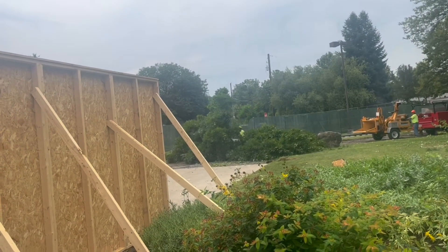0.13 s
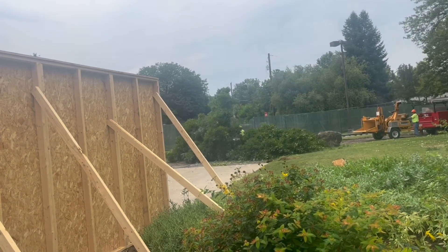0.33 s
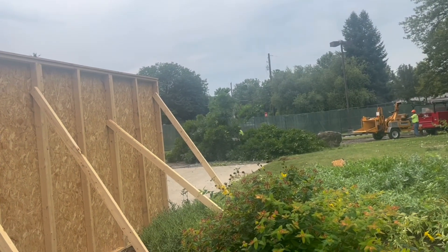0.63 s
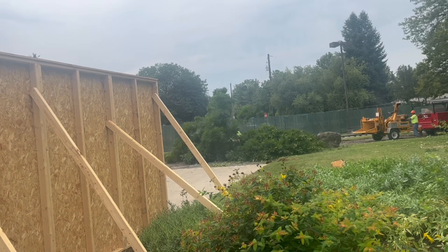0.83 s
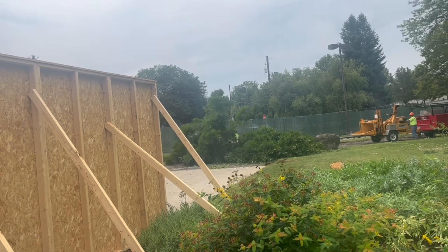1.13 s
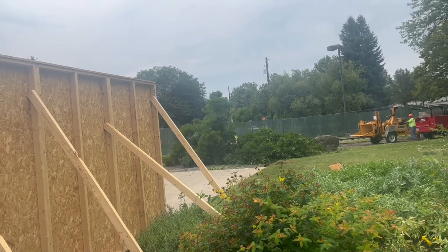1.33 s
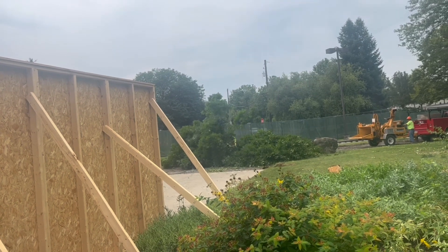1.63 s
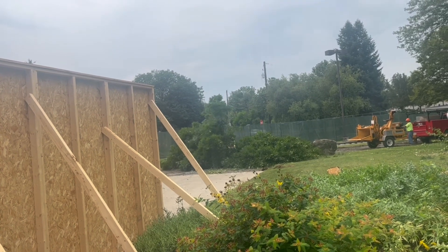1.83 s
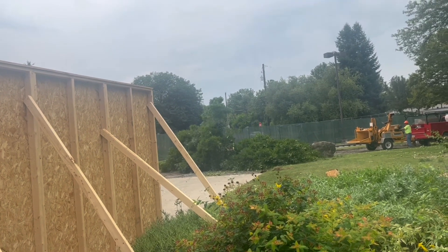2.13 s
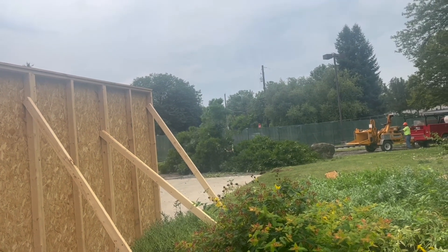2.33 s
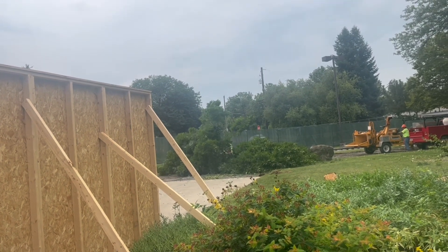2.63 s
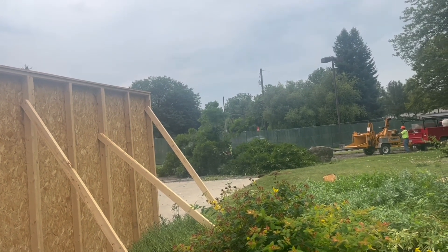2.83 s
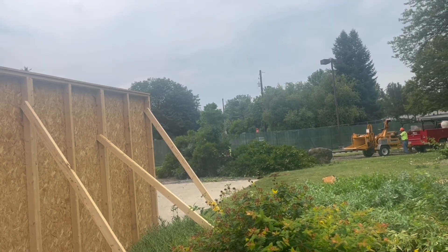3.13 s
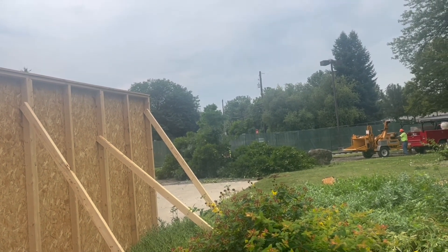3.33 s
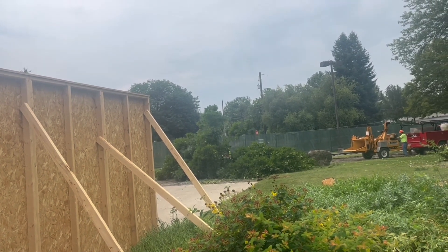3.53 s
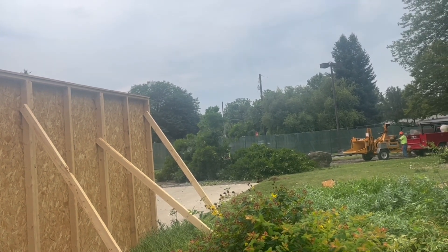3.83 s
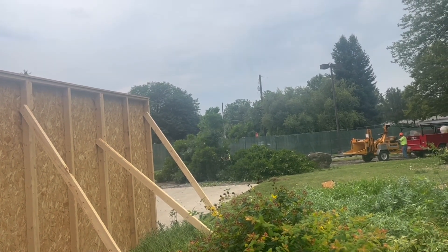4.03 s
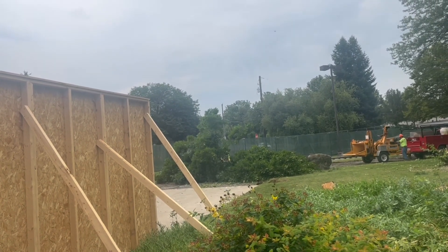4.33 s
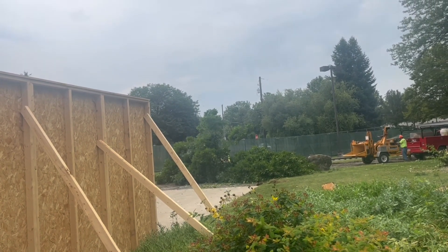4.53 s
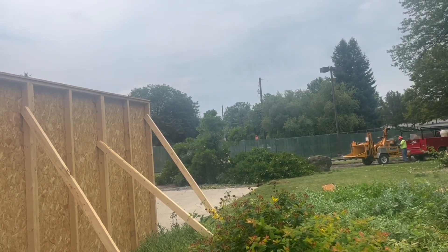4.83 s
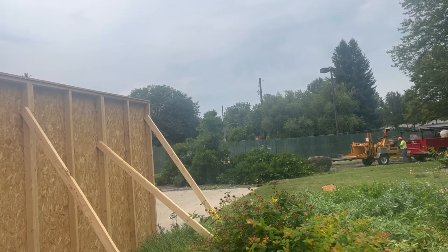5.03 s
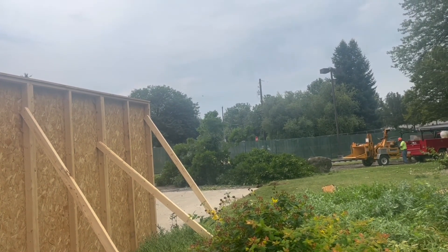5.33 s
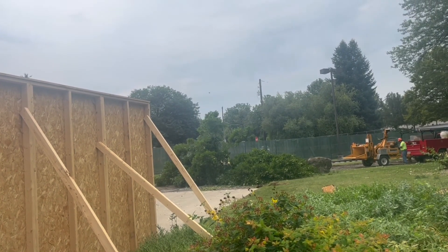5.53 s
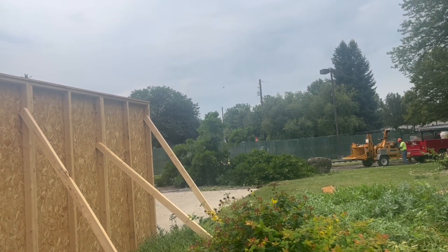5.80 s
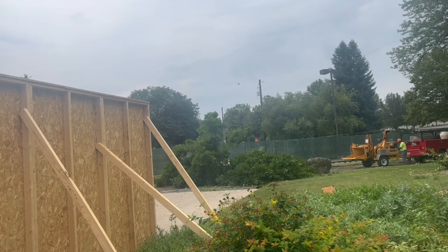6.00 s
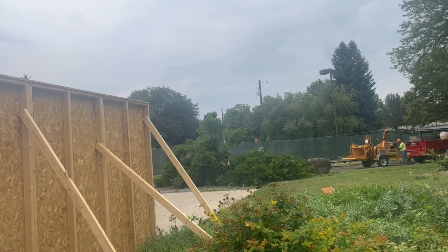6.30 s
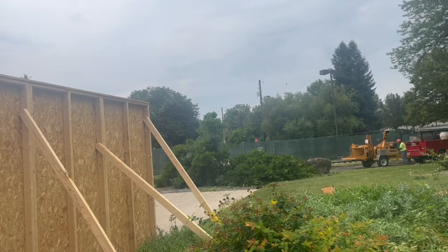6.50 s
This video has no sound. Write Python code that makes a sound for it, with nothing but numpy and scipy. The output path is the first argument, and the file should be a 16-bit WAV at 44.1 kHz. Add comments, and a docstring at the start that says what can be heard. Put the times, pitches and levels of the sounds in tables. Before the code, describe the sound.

Outdoor tree work: low engine throb and metallic idling clatter, then a chainsaw revs hard, cuts, races free, sags and recovers.

```python
"""A tree crew works beyond a lawn, over distant traffic made of soft coloured noise.
At first metal clatters to a chainsaw's idle, above a chipper diesel's drone of wavering tones; a hum and a rustle pass.
After 1.3 s the saw sputters and howls up to speed: pulses ring its muffler and casing, noise hisses as its chain.
It labours in a cut, races free, bogs, races again and bogs once more, while high crank orders whine.
Trees and a fence scatter the saw's exhaust and rasp, and moving air makes its resonances waver."""
import sys
import numpy as np
from scipy import signal
from scipy.fft import rfft, irfft, next_fast_len
from scipy.io import wavfile
from scipy.ndimage import uniform_filter1d

SR = 44100
rng = np.random.default_rng(int(sys.argv[2]) if len(sys.argv) > 2 else 0)


def generate_wav(sig):
    """Save sig (samples, or channels by samples) to the path in sys.argv[1] as 16-bit PCM at SR."""
    pcm = np.round(np.clip(np.atleast_2d(sig).T, -1, 1) * 32767).astype(np.int16)
    wavfile.write(sys.argv[1], SR, pcm)


N = 293706
TIME = np.arange(N) / SR
FREQS = np.fft.rfftfreq(N, 1 / SR)

IDLE_HZ = 48  # crank turns, and so firings, per second
BUILD_S = 0.24  # rasp and hiss build more slowly than the exhaust


def undb(db):
    """Decibels to gain."""
    return 10 ** (np.asarray(db) / 20)


def unit(x):
    """Scale to rms 1."""
    return x / np.sqrt(np.mean(x ** 2))


def steady(x):
    """Even out the loudness: hold the rms near 1 over a sliding fifth of a second."""
    return x / np.sqrt(uniform_filter1d(x ** 2, size=SR // 5) + 1e-18)


def curves(table):
    """The columns of a timed table, one value per sample."""
    s, *columns = np.transpose(table)
    return [np.interp(TIME, s, column) for column in columns]


def across(points):
    """Points joined on a log-frequency axis."""
    hz, value = np.transpose(points)
    return np.interp(np.log(FREQS + 1), np.log(hz), value)


def colour(x, spectrum):
    """Filter by a spectrum of (frequency [Hz], level [dB])."""
    return irfft(rfft(x) * undb(across(spectrum)), N)


def noise():
    """White noise."""
    return rng.standard_normal(N)


def walk(rate):
    """Smooth random drift of spread 1 that changes about rate times a second."""
    size = next_fast_len(N // 32)
    hz = np.fft.rfftfreq(size, TIME[-1] / size)
    keep_slow = np.exp(-(hz / rate) ** 2) * (hz > 0)
    slow = irfft(rfft(rng.standard_normal(size)) * keep_slow, size)
    return unit(np.interp(TIME, np.linspace(0, TIME[-1], size), slow))


def resonate(x, modes, waver_db):
    """Steep resonances; moving air lets each one fade and swell on the way."""
    out = 0
    for hz, width, db in modes:
        edges = np.clip([hz - width / 2, hz + width / 2], 20, SR / 2 - 1)
        bandpass = signal.butter(3, edges, "bandpass", fs=SR, output="sos")
        band = signal.sosfilt(bandpass, x)
        out = out + band * undb(db + waver_db * walk(17.0))
    return out


def scatter(x, t60, wet_db):
    """Trees and fence return a thin diffuse tail, different at each port; t60 in seconds."""
    t = TIME[:SR // 2]
    # the first returns come after 8 ms
    tail = rng.standard_normal((2, len(t))) * undb(-60 * t / t60) * (t > .008)
    tail /= np.sqrt(np.sum(tail ** 2, axis=1, keepdims=True))
    wet = signal.fftconvolve(x[None], tail, axes=1)[:, :N]
    return x + undb(wet_db) * wet


def wide(spectrum, side_db):
    """Coloured stereo noise of rms 1, mostly alike at both ports."""
    side = noise() * np.array([[1], [-1]])
    return unit(colour(noise() + undb(side_db) * side, spectrum))


def opening(seconds):
    """Rise from 0 to 1 once the throttle is pulled at 1.3 s."""
    return np.clip((TIME - 1.3) / seconds, 0, 1)


def traffic():
    """Far roads blend into a soft, steady wash with a faint flutter."""
    # colour of distant traffic: (frequency [Hz], relative level [dB per Hz])
    road_colour = [(100, -9.5), (230, 2.5), (310, -4.5), (660, -9.5), (920, -13.5), (1550, -12.5),
                   (3000, -14.5), (4500, -24), (6800, -22), (9000, -104), (12500, -69)]
    return wide(road_colour, side_db=-8.5) * undb(-39.02 + 0.29 * walk(24))


def clatter():
    """Uneven idle firings shake loose metal, until the throttle opens."""
    # resonances of the loose metal: (frequency [Hz], width [Hz], level [dB])
    metal_modes = [(1180, 230, -2), (2050, 210, -1), (2670, 310, -5), (5330, 3200, -20)]
    turns = np.cumsum(IDLE_HZ * np.exp(0.12 * walk(33))) / SR
    knocks = np.exp(-(turns % 1) / 0.32) * undb(2.7 * walk(33)) * noise()
    metal = unit(resonate(knocks, metal_modes, waver_db=2.5)) * undb(-52)
    return scatter(metal, t60=0.11, wet_db=-20) * (1 - opening(BUILD_S))


def chipper():
    """The diesel sags and recovers as its throb changes; uneven cylinders add half orders and rumble."""
    # engine speed: (time [s], firing rate [Hz])
    diesel_speed = [(0, 59.43), (2.3, 57.27), (2.9, 55.23), (3.35, 50.62), (3.9, 54.32), (5.35, 55.1),
                    (5.95, 60.8), (6.66, 59.3)]
    # loudness: (time [s], fundamental [dB], second harmonic [dB])
    diesel_level = [(0, -36.5, -39.5), (1.2, -38.5, -40), (3.25, -34.5, -41), (3.5, -28.5, -39),
                    (3.76, -27.5, -46), (3.95, -42, -38.5), (4.25, -25.5, -35.5), (4.5, -41, -40),
                    (4.85, -28.5, -38), (5.2, -35.5, -38.5), (5.6, -27, -35), (6.02, -26.5, -28),
                    (6.66, -28, -29)]
    # weaker orders: (multiple of the firing rate, level against the second harmonic [dB])
    half_orders = [(2.5, -13.5)]
    # colour of the engine rumble: (frequency [Hz], relative level [dB per Hz])
    rumble_colour = [(20, -42), (31, -4), (40, -0.5), (55, -4.5), (77, 3.5), (98, -11), (135, -6.5),
                     (200, -12), (300, -45.5)]
    hz, = curves(diesel_speed)
    first_db, second_db = curves(diesel_level)
    phase = 2 * np.pi * np.cumsum(hz * (1 + 0.005 * walk(11.0))) / SR
    drone = np.cos(phase) * undb(first_db)
    drone += np.cos(2 * phase) * undb(second_db + 1.6 * walk(3.1))
    for order, db in half_orders:
        drone += np.sin(order * phase) * undb(second_db + db + 6.7 * walk(3.1))
    throb = -np.sqrt(2) * drone * undb(1.25 * walk(28))
    rumble = wide(rumble_colour, side_db=-57) * undb(-34.5 + 1.5 * walk(17))
    return throb + rumble


def hum(s, length, hz, db):
    """One wavering tone that swells and fades around time s."""
    phase = 2 * np.pi * np.cumsum(hz * (1 + 0.0097 * walk(20.0))) / SR
    return np.sqrt(2) * np.sin(phase) * undb(db) * np.exp(-((TIME - s) / length) ** 2)


def hums():
    """Low hums with harmonics, and faint higher ones, swell and fade within a moment."""
    # low hums: (time [s], length [s], fundamental [Hz], level before the harmonic's own [dB])
    low_hums = [(0.273, 0.096, 71.8, -30), (2.336, 0.33, 73.3, -40.5)]
    # harmonics of every low hum: (multiple, level [dB])
    hum_harmonics = [(1, 1.5), (2, 3), (3, -10)]
    # higher hums: (time [s], length [s], frequency [Hz], level [dB])
    faint_hums = [(0.454, 0.14, 265.3, -49.5), (1.275, 0.28, 266.8, -44.5)]
    out = 0
    for s, length, hz, db in low_hums:
        for order, relative_db in hum_harmonics:
            out = out + hum(s, length, order * hz, db + relative_db)
    for row in faint_hums:
        out = out + hum(*row)
    return out


def rustle():
    """A short hiss of coloured noise swells and fades over the idle."""
    # colour of the rustle: (frequency [Hz], relative level [dB per Hz])
    rustle_colour = [(500, 4), (2050, -5), (4200, -6.5), (7000, -13), (8500, -15)]
    peak_s, length_s = 0.29, 0.13
    swell = np.exp(-((TIME - peak_s) / length_s) ** 2)
    return wide(rustle_colour, side_db=-22) * undb(-41 + 1.3 * walk(45)) * swell


def firings(turns, scatter_db):
    """One sharp pulse per crank turn, each of its own strength."""
    at = np.interp(np.arange(1, int(turns[-1])), turns, np.arange(N))
    size = undb(scatter_db * noise()[:len(at)])
    # a windowed sinc places each pulse between samples
    taps = at.astype(int)[:, None] + np.arange(-7, 9)
    offset = taps - at[:, None]
    shape = np.sinc(offset) * np.cos(np.pi * offset / 16) ** 2
    return np.bincount(np.clip(taps, 0, N - 1).ravel(), (size[:, None] * shape).ravel(), N)


def loudness(hz, law):
    """Gain of one part of the saw: it grows with speed up to the cut, and may shift again when racing."""
    cut_hz, race_hz = 176.7, 207  # firing rates in a steady cut and when racing free
    cut_db, db_per_octave, race_db = law
    racing = np.clip((hz - cut_hz) / (race_hz - cut_hz), 0, 1)
    slowing_octaves = np.minimum(np.log2(hz / cut_hz), 0)
    return undb(cut_db + db_per_octave * slowing_octaves + race_db * racing)


def pumping(hz, turns):
    """Gas surging from the outlet gives the two lowest harmonics; the fundamental trails each firing."""
    # strength of the surge: (firing rate [Hz], fundamental [dB], second harmonic [dB])
    surge_level = [(70, -29.5, -59), (94.5, -29, -41), (176.76, -29, -38.5), (185.5, -29, -50.5),
                   (189.7, -27.5, -34), (231.4, -30, -29.5)]
    speed, first_db, second_db = np.transpose(surge_level)
    first = np.sin(2 * np.pi * turns) * undb(np.interp(hz, speed, first_db) + 1.08 * walk(17.0))
    second = np.cos(4 * np.pi * turns) * undb(np.interp(hz, speed, second_db) + 1.7 * walk(29))
    return np.sqrt(2) * (first + second)


def casing(hz, drive):
    """The casing rings with every firing; its highest resonances wake only as the saw gathers speed."""
    # casing resonances: (frequency [Hz], width [Hz], level [dB])
    casing_modes = [(1870, 187, -2), (2331, 230, -8), (2780, 267, -3), (3048, 273, -7), (3483, 216, -0.5),
                    (3953, 330, 3), (4450, 270, -2.5), (6430, 520, -12)]
    dull_hz, bright_hz = 115, 160  # firing rates where the top is absent and complete
    ring = steady(resonate(drive, casing_modes, waver_db=2.3))
    above = 1 - 1 / (1 + (FREQS / 3570) ** 20)  # keeps what lies over 3570 Hz
    top = irfft(rfft(ring) * above, N)
    return ring - top * np.clip((bright_hz - hz) / (bright_hz - dull_hz), 0, 1)


def whines(hz, turns):
    """High crank orders swell as they catch a resonance of bar and casing; they smear when the saw bogs."""
    # narrow resonances of bar and casing: (frequency [Hz], width [Hz], level [dB])
    bar_rings = [(2320, 120, -16.5), (2690, 170, -7), (2923, 194, -8.5), (3418, 140, -7), (3860, 196, 0.5),
                 (4320, 300, -9.5), (5030, 190, -16), (6160, 1100, -23.5)]
    # parts that sing out: (time [s], length [s], centre [Hz], width [Hz], boost [dB])
    whine_swells = [(2.349, 0.16, 3020, 120, 11.5), (3.102, 0.23, 4150, 220, 9.5),
                    (3.103, 0.21, 3460, 100.1, 8.5), (3.972, 0.36, 3895, 132, 9.5),
                    (4.481, 0.15, 3545, 476, 12), (5.421, 0.35, 2701, 210.2, 4.5),
                    (5.249, 0.31, 3866, 150.7, 6.5), (5.98, 0.35, 3600, 260, 6.5)]
    fan_order, fan_db = 15, 6  # this order sings above its neighbours, likely the flywheel's fan
    swells = []
    for s, length, centre, width, db in whine_swells:
        swells.append((centre, width, db * np.exp(-((TIME - s) / length) ** 4)))
    flutter = np.interp(hz, [155, 176], [.5, .12])  # phase spread in radians
    out = 0
    for order in range(12, 37):
        pitch = order * hz
        catch = sum(undb(db) / (1 + (2 * (pitch - centre) / width) ** 2)
                    for centre, width, db in bar_rings)
        swell_db = sum(db * np.exp(-np.minimum(((pitch - centre) / width) ** 2, 20))
                       for centre, width, db in swells)
        phase = 2 * np.pi * order * turns + 0.41 * walk(25) + flutter * walk(100)
        tone = np.sqrt(2) * np.sin(phase)
        out = out + tone * catch * undb(swell_db + fan_db * (order == fan_order) + 1.64 * walk(28))
    return out


def howl(turns):
    """A rough band, throbbing with the firings, climbs as the chain gets under way."""
    # the climb: (time [s], centre [Hz], level [dB])
    howl_path = [(1.4, 3400, -63), (1.6, 3680, -43), (1.7, 3810, -44), (1.86, 4230, -74)]
    width_hz = 260
    hz, db = curves(howl_path)
    phase = 2 * np.pi * np.cumsum(hz) / SR
    band = walk(width_hz) * np.cos(phase) + walk(width_hz) * np.sin(phase)
    return unit(band * np.exp(-(turns % 1) / 1.4)) * undb(db)


def sputter(turns):
    """Rich, ragged firings burst through the muffler before the saw clears into a tone."""
    # muffler band that they shake: (frequency [Hz], width [Hz], level [dB])
    sputter_band = [(646, 240, 0)]
    peak_s, length_s = 1.547, 0.12
    puffs = np.exp(-(turns % 1) / .45) * noise()
    burst = steady(resonate(puffs, sputter_band, waver_db=4))
    return burst * undb(-40) * np.exp(-((TIME - peak_s) / length_s) ** 4)


def chainsaw():
    """Firings ring muffler and casing; a puff of gas follows each; the chain hisses round the bar."""
    # crank speed with the throttle open: (time [s], firing rate [Hz])
    saw_speed = [(1.42, 72.74), (1.59, 112.5), (1.7, 138.5), (1.81, 158.8), (1.93, 176.4), (2.11, 182.6),
                 (2.36, 186.8), (2.75, 183.6), (3.0, 181.5), (3.28, 180.4), (3.44, 186), (3.78, 180.8),
                 (3.98, 183.9), (4.17, 187.7), (4.24, 177.6), (4.35, 198.4), (4.53, 214.7), (4.59, 208.9),
                 (4.7, 164.5), (4.82, 153.5), (4.98, 158.1), (5.3, 183.2), (5.61, 175.1), (5.75, 206),
                 (5.9, 228.1), (6.15, 215.8), (6.29, 189.4), (6.41, 189.3), (6.56, 160.8), (6.66, 149.9)]
    # slow drift in loudness: (time [s], muffler [dB], hiss [dB])
    saw_drift = [(1.5, -1, -1), (2.4, 1.5, 2.5), (3.1, 1.5, 2), (3.7, 3, 1.5), (5.4, 1.45, 0),
                 (6.1, 3.4, 2.6), (6.66, 0.7, -1.5)]
    # muffler resonances: (frequency [Hz], width [Hz], level [dB])
    muffler_modes = [(529, 162, -11.5), (706, 148, 1.5), (1056, 159, -8.5), (1275, 110, -13)]
    # a bright exhaust resonance that swells at moments late on, mostly as the saw races:
    # (frequency [Hz], width [Hz], level [dB])
    bark_mode = [(1424, 176, 0)]
    # loudness of that bark: (time [s], level [dB])
    bark_level = [(1.5, -51), (4.15, -47), (4.5, -36.5), (4.8, -51), (5.35, -38), (5.6, -43), (5.95, -38),
                  (6.66, -45)]
    # colours of the chain hiss and its finest part: (frequency [Hz], relative level [dB per Hz])
    chain_colour = [(200, -1.5), (600, 7.5), (850, 5.5), (1200, 8.5), (1620, 4), (1900, 3), (2900, 6.5),
                    (4200, -2.5), (5000, 1), (5550, -3), (6150, 2), (7500, -5), (9500, -112)]
    chain_top_colour = [(5500, -6), (7600, -72), (8800, 21), (10300, 15.5), (12300, 11.5), (13700, 10.5),
                        (15500, 4)]
    # loudness of each part: (level at cutting speed [dB], loss per octave below it [dB],
    # change when racing [dB])
    muffler_law = (-29.5, 14.5, -2.4)
    rasp_law = (-37, 2.8, -0.24)
    whine_law = (-42.5, 13.4, 0.64)
    chain_law = (-39, 5.6, 0)
    chain_top_law = (-48.5, 0.8, 0)

    hz, = curves(saw_speed)
    muffler_db, hiss_db = curves(saw_drift)
    bark_db, = curves(bark_level)
    throttle, build = opening(.17), opening(BUILD_S)
    hz = IDLE_HZ + throttle * (hz - IDLE_HZ)
    # the uneven bite of the chain jostles the crank
    turns = np.cumsum(hz * (1 + 0.0035 * walk(12))) / SR
    pulses = steady(firings(turns, scatter_db=0.5))
    # at low speed the cylinder scavenges badly and burns roughly
    rough_db = np.interp(hz, [95, 150], [10, 0])
    puffs = unit(np.exp(-(turns % 1) / 1.9) * noise()) * undb(rough_db)
    gas = colour(puffs, [(200, -33), (750, -22.0), (1100, -16.5), (1500, -9.0)])

    muffler = steady(resonate(pulses + gas, muffler_modes, waver_db=1.0)) * loudness(hz, muffler_law)
    exhaust = scatter(muffler * undb(muffler_db) + sputter(turns), t60=1.0, wet_db=-14.5)
    exhaust = exhaust + scatter(pumping(hz, turns), t60=0.82, wet_db=-22.5)

    bark = steady(resonate(pulses + undb(-6) * puffs, bark_mode, waver_db=2)) * undb(bark_db)
    rasp = casing(hz, pulses + undb(-2.5) * puffs) * loudness(hz, rasp_law)
    rasp = rasp + whines(hz, turns) * loudness(hz, whine_law)

    chain = wide(chain_colour, side_db=-8.0) * loudness(hz, chain_law)
    chain = chain + wide(chain_top_colour, side_db=-91.0) * loudness(hz, chain_top_law)
    # moving air makes the hiss flutter, and each firing jerks the chain
    flutter_db = 1.0 * walk(25) + 0.27 * walk(150)
    jerk_db = 0.5 * np.cos(2 * np.pi * turns)
    chain = chain * undb(hiss_db + flutter_db + jerk_db)

    treble = scatter(rasp + bark + howl(turns), t60=0.2, wet_db=-11) + chain
    # both stay low at idle and rise with the throttle
    return exhaust * undb(-24 * (1 - throttle)) + treble * undb(-22 * (1 - build))


def ports(x):
    """Sound reaches the two microphone ports with different phase and strength."""
    # lag between the ports: (frequency [Hz], phase by which left leads [radians])
    port_phase = [(200, 0), (720, .55), (1100, .8), (1450, 1.9), (1850, .1), (2900, .4), (4700, .15),
                  (6700, -.9), (8000, -2.9), (9500, -3.5), (10600, -5.9), (13200, -6.7), (14500, -9.2)]
    # strength at the ports: (frequency [Hz], left minus right [dB])
    port_balance = [(110, 0), (200, -.5), (370, .5), (680, -2), (1260, 4), (2310, 1.6), (4240, 0)]
    tilt = undb(across(port_balance) / 2)
    right = np.exp(-1j * across(port_phase)) / tilt
    return irfft(rfft(x) * np.array([tilt, right]), N)


def scene():
    """Saw and chipper over the background."""
    background = traffic() + hums() + rustle()
    return ports(clatter() + chipper() + chainsaw() + background)


def record(dry):
    """A steep low-pass cuts the top above 15.5 kHz."""
    return signal.sosfilt(signal.ellip(8, .2, 70, 15500, fs=SR, output="sos"), dry)


dry = scene()
out = record(dry)
generate_wav(out)
```